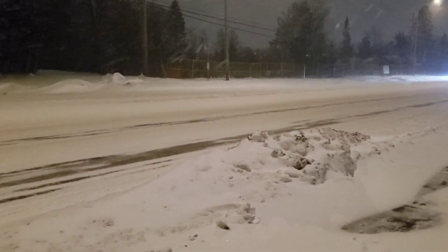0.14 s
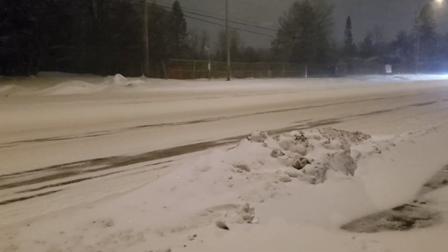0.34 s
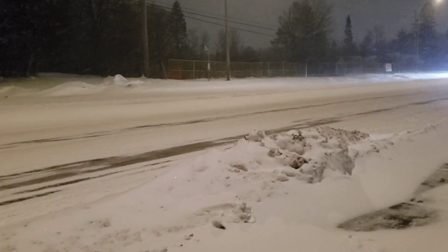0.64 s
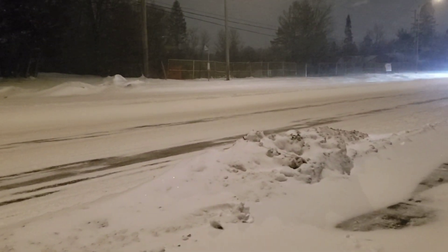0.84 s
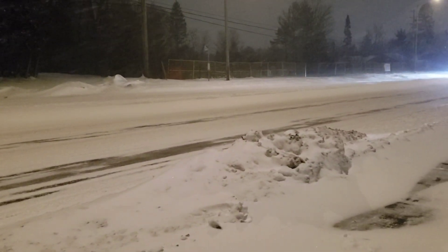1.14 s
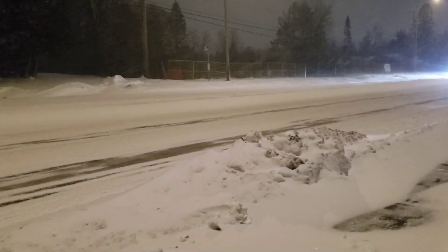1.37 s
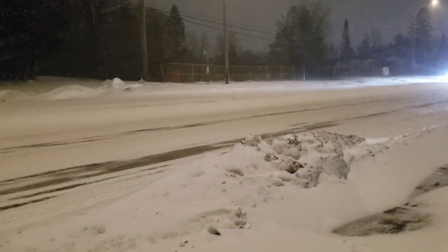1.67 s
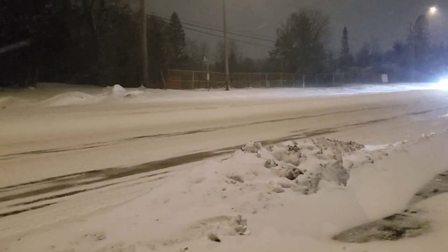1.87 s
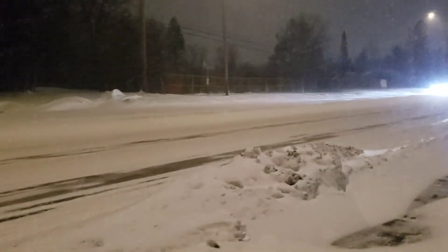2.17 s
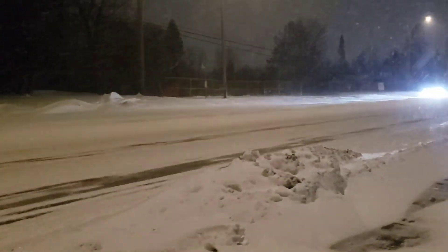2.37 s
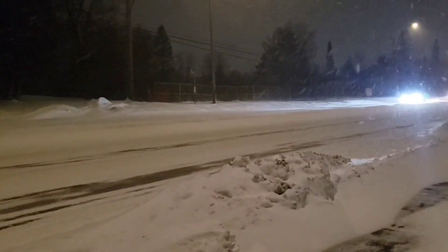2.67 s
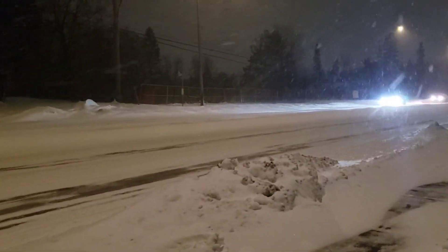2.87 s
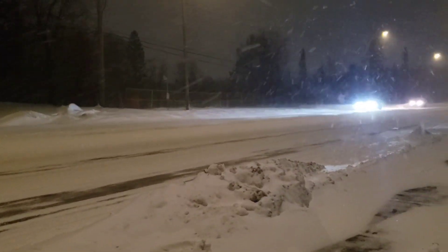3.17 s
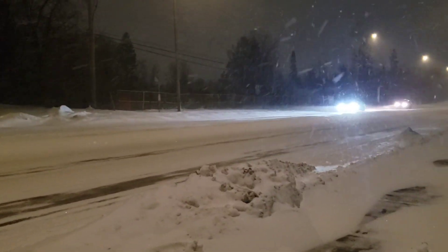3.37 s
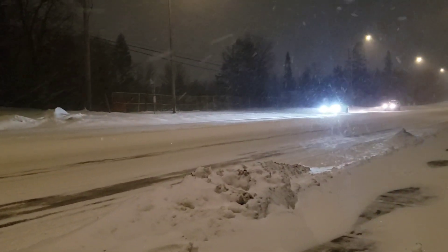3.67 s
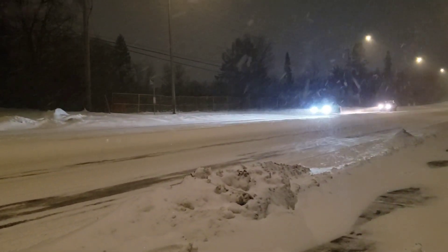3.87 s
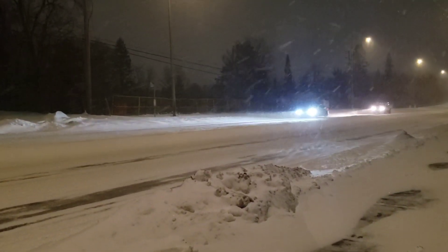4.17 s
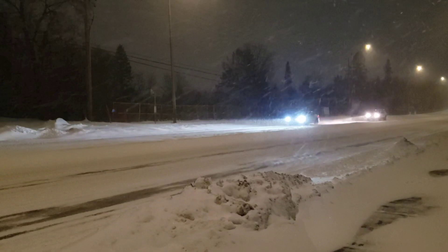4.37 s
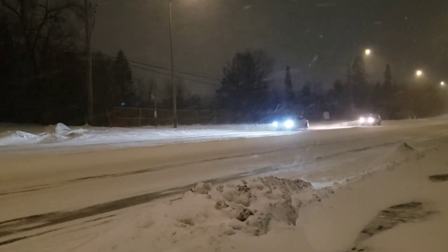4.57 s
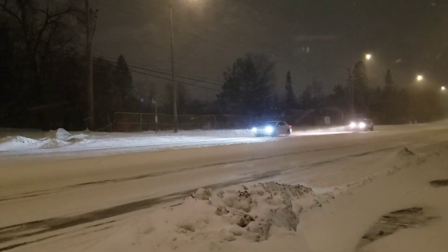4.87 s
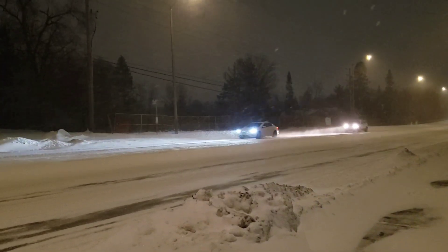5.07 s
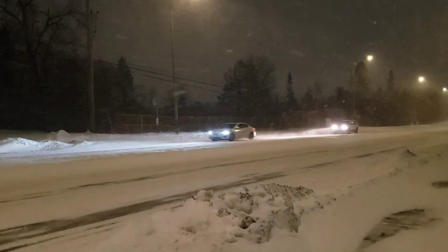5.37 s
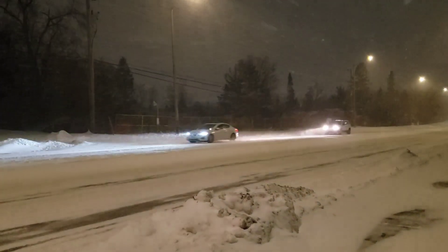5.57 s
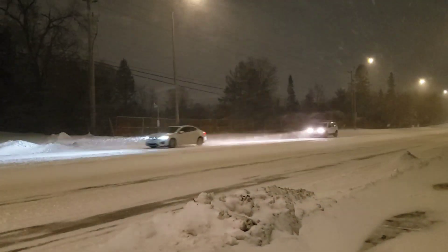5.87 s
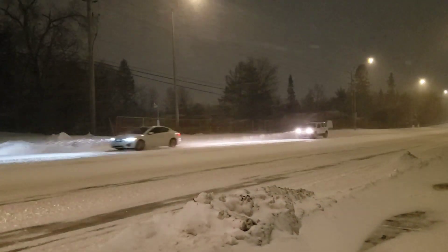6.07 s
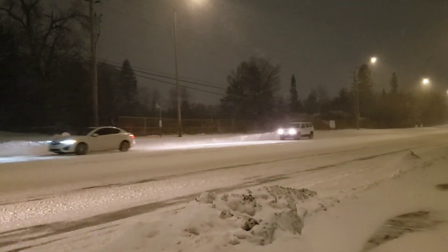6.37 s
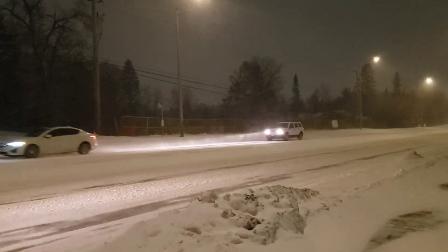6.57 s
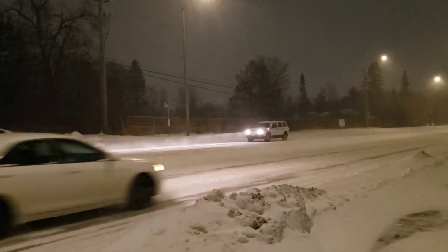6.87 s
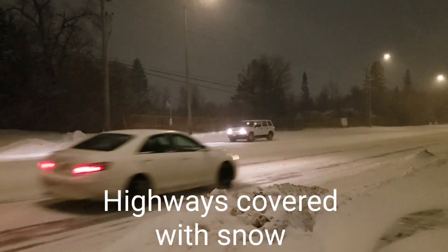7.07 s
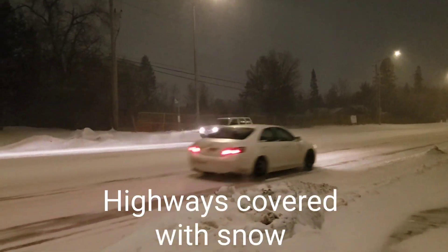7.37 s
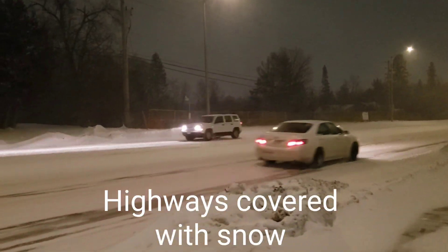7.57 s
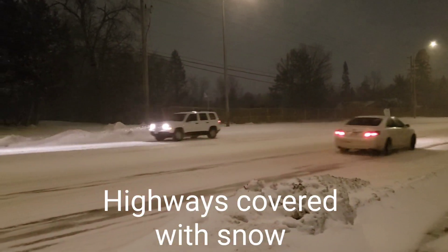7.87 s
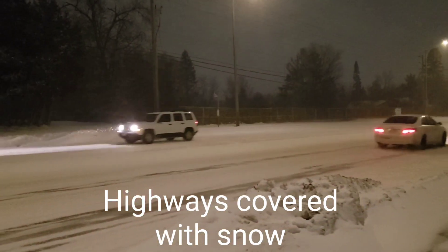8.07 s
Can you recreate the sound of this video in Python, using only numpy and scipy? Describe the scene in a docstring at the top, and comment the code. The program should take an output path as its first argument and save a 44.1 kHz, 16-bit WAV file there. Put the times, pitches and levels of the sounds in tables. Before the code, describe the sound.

Close, bassy wind buffeting shifts irregularly between the two channels of a phone microphone. Short gusts with fine icy patter give way to a lull of distant wind, traffic murmur and thin hiss. Halfway, fluttering resumes and builds to a hard burst of hollow knocks, deep thumps and torn hiss. Cars rolling over snow are only a soft wash behind it, and the wind finally subsides.

```python
"""Gusts of a snowstorm buffet the two ports of a phone microphone beside a road, with lulls between.
Noise bands flutter and rumble apart in each port; hard gusts tear into hiss, and direct hits knock and thump.
Short bursts of high noise are snow grains on the case: a fine patter in flurries, and single larger ticks.
Behind lie quieter coloured noises: wavering far wind and traffic, sifting snow, microphone hiss, and tyres
that swell and fade. One faint, thin swish crosses the long lull."""
import sys
import numpy as np
from scipy import signal
from scipy.fft import rfft, irfft, next_fast_len
from scipy.io import wavfile
from scipy.ndimage import uniform_filter1d

SR = 44100
rng = np.random.default_rng(int(sys.argv[2]) if len(sys.argv) > 2 else 0)


def to_wav(sig):
    """Store sig (one row per channel, or 1-D mono) as 16-bit WAV at the path in sys.argv[1].

    Samples outside -1..1 are clipped; the rate is SR.
    """
    pcm = np.clip(np.atleast_2d(sig), -1, 1) * 32767
    pcm = np.round(pcm).astype(np.int16)
    wavfile.write(sys.argv[1], SR, pcm.T)  # frames by channels


N = 362943
T = np.arange(N) / SR


def from_db(db):
    """Decibels to gain."""
    return np.exp(np.asarray(db) * np.log(10) / 20)


def to_db(gain):
    """Gain to decibels."""
    return 20 * np.log10(gain + 1e-6)


def rms_one(x):
    """Scale each channel to rms 1."""
    return x / np.sqrt(np.mean(x ** 2, axis=-1, keepdims=True) + 1e-20)


def level_over_time(rows):
    """Join (time, level) rows by straight lines."""
    s, db = np.transpose(rows)
    return np.interp(T, s, db)


def at_hz(spectrum, hz):
    """Read a spectrum on a log-frequency axis."""
    points_hz, points_db = np.transpose(spectrum)
    return np.interp(np.log(hz), np.log(points_hz), points_db)


def panned(balance_db):
    """Left and right gains of constant total power; positive leans left."""
    gains = from_db(np.array([[.5], [-.5]]) * balance_db)
    return gains / np.sqrt(np.mean(gains ** 2, axis=0))


def drift(corner_hz):
    """Smooth chance with spread 1, unrelated at the two ports: noise through two equal low-pass stages."""
    step, settling = 40, 2000   # drawn at every 40th sample; the filter's start is dropped
    r = np.exp(-2 * np.pi * corner_hz * step / SR)
    chance = rng.standard_normal((2, N // step + 2 + settling))
    slow = rms_one(signal.lfilter([1], [1, -2 * r, r * r], chance)[:, settling:])
    return np.array([np.interp(np.arange(N) / step, np.arange(len(c)), c) for c in slow])


def coloured(x, spectrum):
    """Give a signal a smooth spectrum that falls away towards and beyond its ends; rms 1."""
    size = next_fast_len(N)
    hz = np.maximum(np.arange(size // 2 + 1) * SR / size, 1)
    low_end = 1 / (1 + (spectrum[0][0] / hz) ** 4)
    high_end = 1 / (1 + (hz / (2 * spectrum[-1][0])) ** 6)
    gain = from_db(at_hz(spectrum, hz)) * low_end * high_end
    return rms_one(irfft(rfft(x, size) * gain, size)[:, :N])


def noise(spectrum):
    """Coloured noise, unrelated in the two channels."""
    return coloured(rng.standard_normal((2, N)), spectrum)


def evened(x, size):
    """Take the slow swings out of a noise by dividing by its running rms over size samples."""
    return x / np.sqrt(np.maximum(uniform_filter1d(x ** 2, size, axis=-1), 1e-12))


def band_passed(x, order, low_hz, high_hz):
    """Keep one band of a signal."""
    return signal.sosfilt(signal.butter(order, [low_hz, high_hz], "band", fs=SR, output="sos"), x)


def gust_shape(start, hold, force_db, swell_db):
    """A gust announces itself, rises, swells or sags, and drops into its wake; hard ones are cut cleaner."""
    attack_s, release_s = .018, 0.032   # the release is shorter in hard gusts
    lead_db, lead_s = -8.5, .02   # the first eddies run ahead of a gust
    wake_db, wake_s = -11, 0.11   # a weaker trail of eddies follows it
    # lead and wake lose 0.22 dB for each dB by which the gust exceeds -45 dB
    clean_db = 0.22 * max(force_db + 45, 0)
    age, after = np.maximum(T - start, 0), np.maximum(T - start - hold, 0)
    lead = from_db(lead_db - clean_db) * np.exp(np.minimum(T - start, 0) / lead_s)
    attack = np.maximum(1 - np.exp(-(age / attack_s) ** 2), lead)
    drop = np.exp(-after / (release_s * from_db(-clean_db)))
    wake = from_db(wake_db - clean_db) * np.exp(-after / wake_s)
    grown_db = swell_db * (np.minimum(age / hold, 1) - .5)
    return attack * np.maximum(drop, wake) * from_db(grown_db) + 1e-9, grown_db


def flow():
    """Gust powers add over a faint breeze: force, treble edge, eddy pitch, share of each port and slow push."""
    # gusts at the ports, levels before trims and drifts: (start [s], hold [s], force [dB],
    # swell over the hold [dB], edge: 900-2500 Hz against force, before swell [dB], eddy pitch [Hz],
    # left-right balance [dB], rumble [dB], rumble left-right balance [dB])
    gusts = [(-0.005, 0.27, -47, -6.5, -14, 344, -3.5, -49.5, -8),
             (0.352, 0.055, -49, -17.5, -23, 370, 0, -53, -9),
             (0.527, 0.03, -64, -4, -44, 380, 5, -58, -28), (0.635, 0.03, -52.5, 5, -35, 385, 2, -54, -13),
             (0.71, 0.13, -62, -11, -35, 368, 5, -55.5, -28),
             (1.048, 0.058, -52.5, 10.5, -38, 390, 10, -60.5, -24),
             (1.546, 0.046, -66.5, 1, -33, 320, 0, -71, -16), (3.257, 0.1, -51.5, -2, -15, 384, -1, -47, 1),
             (3.377, 0.12, -57.5, -5, -23, 300, -1, -52, -10),
             (3.554, .21, -52.5, -6, -17, 524, -2.5, -55, 7),
             (3.813, 0.18, -50, -9, -17.5, 413, -0.5, -49.5, -3),
             (4.023, 0.15, -52, -5, -27, 387, -2.5, -56.5, -15),
             (4.22, 0.19, -59.5, 3, -40, 330, -1, -55, -12),
             (4.372, 0.2, -53, 6.5, -19.5, 462, 0, -59.5, 4.5),
             (4.59, 0.14, -48.5, -1, -12.5, 613, 0, -53.5, 2),
             (4.767, .055, -60.5, -11, -16, 400, 13, -57, -6),
             (5.272, 0.23, -42.5, 10, -9.5, 425, -1.5, -44.5, 1.5),
             (5.578, 0.31, -41, 4, -8.5, 456, -3, -45.5, 6.5),
             (5.942, 0.057, -38.5, 4.5, -10, 415, 2, -43, 2), (6.054, 0.23, -33, 6.5, -10, 370, -2, -40, 2),
             (6.369, 0.057, -25.5, 3.5, -12, 378, -5, -31.5, -1),
             (6.465, 0.44, -31.5, -5, -11.5, 363, -4, -37.5, 2.5),
             (6.944, 0.2, -30, 0, -14, 364, -1, -35, -12.5),
             (7.213, 0.057, -43.5, -19.5, -11, 380, 3, -42, -20),
             (7.441, 0.051, -40, 2.5, -21, 440, 1.5, -51.5, -2),
             (7.548, .16, -54.5, 0.5, -23.5, 373, 2, -57.5, -22),
             (7.849, 0.16, -50.5, -3.5, -21, 350, -0.5, -54, -22),
             (8.11, 0.095, -50.5, -8, -25.5, 325, -1, -52.5, -15)]
    edge_per_swell = 0.083   # dB of edge gained for each dB by which a gust swells
    rumble_follows = 0.87   # share of the gust's swing in dB that the rumble follows
    # between gusts a breeze remains, with an edge of -23 dB and an eddy pitch of 400 Hz
    breeze_db, breeze_rumble_db, breeze_rumble_balance_db = -81, -84, -21
    breeze = from_db(breeze_db) ** 2
    power, edge, pitch = breeze, breeze * -23, breeze * 400
    push = (from_db(breeze_rumble_db) * panned(breeze_rumble_balance_db)) ** 2
    for start, hold, force_db, swell_db, edge_db, hz, balance_db, rumble_db, rumble_balance_db in gusts:
        shape, grown_db = gust_shape(start, hold, force_db, swell_db)
        gust = (shape * from_db(force_db)) ** 2
        power = power + gust * panned(balance_db) ** 2
        edge = edge + gust * (edge_db + edge_per_swell * grown_db)
        pitch = pitch + gust * hz
        full_push = from_db(rumble_db) * panned(rumble_balance_db)
        push = push + shape ** (2 * rumble_follows) * full_push ** 2
    total = power.mean(axis=0)
    return to_db(np.sqrt(total)), edge / total, pitch / total, np.sqrt(power / total), np.sqrt(push)


def surges(per_s=90, fade_s=0.015):
    """Small eddies strike at random, each rising in about 2 ms and fading slowly, around a running mean."""
    strikes = (rng.random((2, N)) < per_s / SR) * rng.uniform(0.43, 1, (2, N))
    push = signal.lfilter([1], [1, -np.exp(-1 / (fade_s * SR))], strikes + 1e-18)
    push = uniform_filter1d(push, size=90, axis=-1)
    swings = push - uniform_filter1d(push, size=2200, axis=-1)
    return np.clip(rms_one(swings), -2.5, 1.4)


def flutter(force_db, edge_db, pitch_hz):
    """Eddies of all sizes, strongest near one pitch; a higher edge means smaller ones and tilts the treble up."""
    # colour of wind in the ports: (frequency [Hz], level [dB per Hz])
    port = [(140, 3.5), (200, 4), (280, 2), (390, 1.5), (550, -2.5), (780, -4.5), (1100, -10.5),
            (1550, -16.5), (2200, -25.5), (3100, -38), (4400, -41), (6200, -97)]
    knee_hz, usual_edge_db, tilt = 520, -13, 1.0   # tilt: dB per octave for each dB of edge
    hump_db, hump_octaves, patchy_db = 5, 0.68, 2.5
    full_db, thinning = -33, 0.77   # below this force the bass thins out
    white = rng.standard_normal((2, 2, N))   # neighbouring bands take different noises
    edges = 120 * 2 ** np.arange(0, 6.6, .5)   # half-octave bands
    slope_db = tilt * (np.clip(edge_db, -32, -6) - usual_edge_db)   # per octave
    # in light wind the phone thins the bass, most on the left
    thin_db = thinning * np.minimum(force_db - full_db, 0) * [[2], [.5]]
    out, body_power = 0, 0
    for k, (low, high) in enumerate(zip(edges, edges[1:])):
        hz = np.sqrt(low * high)
        band = evened(band_passed(white[k % 2], 3, low, high), size=2600)
        hump = np.exp(-(np.log2(hz / pitch_hz) / hump_octaves) ** 2)
        tilt_db = slope_db * np.clip(np.log2(hz / knee_hz), 0, 2.2)
        gain = from_db(at_hz(port, hz) + hump_db * hump + tilt_db) * np.sqrt(high - low)
        shade_db = thin_db if hz < 240 else 0
        out = out + gain * band * from_db(shade_db + patchy_db * drift(70))
        if 180 < hz < 850:   # the force is the level of this body
            body_power = body_power + gain ** 2
    return from_db(force_db) * out / np.sqrt(body_power)


def rumble(push, churn, trim_db=2.5, churn_db=4.5, lumpy_db=3.0, lag_s=0.011):
    """Large eddies push on each port as slow lumps of pressure that trail the gust."""
    # colour of the pressure lumps: (frequency [Hz], level [dB per Hz])
    spectrum = [(16, -30), (40, -6), (65, 4.5), (100, -1.5), (150, -8), (210, -10.5), (300, -37)]
    keep = np.exp(-1 / (lag_s * SR))
    trailing = signal.lfilter([1 - keep], [1, -keep], push)
    lumps = from_db(trim_db + lumpy_db * drift(21) + churn_db * churn)
    return trailing * lumps * evened(noise(spectrum), size=3000)


def far_murmur(side_db=8, waver_db=2.0):
    """Far wind and traffic blur into a wavering noise, stronger on the left."""
    # the distance: (time [s], level before waver [dB])
    levels = [(0, -62.5), (1.3, -73), (1.7, -69.5), (2.3, -69), (2.7, -72.5), (3.2, -70), (5, -66),
              (8.23, -70)]
    # its colour: (frequency [Hz], level [dB per Hz])
    spectrum = [(25, -18), (65, -10), (130, -12), (200, -18), (300, -6), (420, 0), (550, 0), (780, -11),
                (1400, -15), (2300, -20.5), (4000, -24), (8000, -34)]
    level_db = level_over_time(levels) + waver_db * drift(29)
    return from_db(level_db) * panned(side_db) * noise(spectrum)


def sifting_snow(trim_db=-10.0, side_db=22):
    """Snow sifting over the ground makes a bright noise of changing level, nearly all on the left."""
    # the sifting: (time [s], level before trim [dB])
    levels = [(0, -59), (.55, -55.5), (.8, -64.5), (2.9, -66), (3.4, -56.5), (5.2, -56), (8.23, -58.5)]
    # its colour: (frequency [Hz], level [dB per Hz])
    spectrum = [(2400, -20), (3400, -10), (4800, -3), (6800, 0), (8500, -2), (11000, -8), (16000, -13)]
    return from_db(level_over_time(levels) + trim_db) * panned(side_db) * noise(spectrum)


def microphone_hiss(trim_db=-3.0, side_db=14):
    """The microphone's own high noise, stronger on the left."""
    # the hiss: (time [s], level before trim [dB])
    levels = [(0, -59), (3, -59.5), (6.7, -60.5), (7.1, -62.5), (8.23, -65.5)]
    # its colour: (frequency [Hz], level [dB per Hz])
    spectrum = [(1700, -20), (2300, -15), (3000, -8), (4200, -9), (5500, -13), (8400, -11), (9800, -1),
                (12000, 0), (16000, -.5)]
    return from_db(level_over_time(levels) + trim_db) * panned(side_db) * noise(spectrum)


def ticks(trim_db=-1, low_hz=7500, fade_s=.0011):
    """A larger grain shatters on the case: high-passed noise that fades in a millisecond or two."""
    # larger grains: (time [s], peak before trim and high-pass [dB])
    grains = [(0.03, -40), (0.233, -37.5), (0.2838, -49), (0.2904, -46), (0.5564, -43), (1.1764, -56),
              (3.105, -48), (3.369, -40.5), (3.8807, -43), (5.4126, -42), (5.4244, -49), (5.444, -43),
              (5.655, -46), (5.672, -38), (6.2517, -52), (6.4892, -38), (6.556, -51), (6.711, -41)]
    crush, age = np.zeros((2, N)), T[:SR // 100]
    for (s, peak_db), side_db in zip(grains, rng.normal(0, 4.4, len(grains))):
        at = int(s * SR)
        crush[:, at:at + len(age)] += from_db(peak_db + trim_db) * panned(side_db) * np.exp(-age / fade_s)
    high_pass = signal.butter(2, low_hz, "high", fs=SR, output="sos")
    return signal.sosfilt(high_pass, crush * rng.standard_normal((2, N)) + 1e-18)


def flurries():
    """Level of the driven snow in dB: each flurry thickens to a peak and thins out again."""
    # snow driven against the case: (peak time [s], fade to either side [s], level before trim [dB])
    rows = [(0.03, 0.064, -48), (0.285, 0.034, -51), (3.7, 0.78, -65.5), (5.665, 0.056, -57),
            (5.869, 0.13, -59), (6.225, 0.084, -52), (6.427, 0.019, -45), (6.559, 0.083, -50.5),
            (6.77, 0.063, -50.5), (6.89, 0.01, -50.5)]
    power = sum((from_db(db) * np.exp(-np.abs(T - s) / fade_s)) ** 2 for s, fade_s, db in rows)
    return to_db(np.sqrt(power))


def snow_grains(spray_db, trim_db=-2, grains_per_s=1100):
    """Fine ice grains patter on the case in clumps: random impulses of many sizes, coloured bright."""
    # colour of a grain on the case: (frequency [Hz], level [dB per Hz])
    spectrum = [(3000, 0), (6000, -13), (8300, -18), (9800, -2.5), (12500, 1.5), (16000, -4)]
    sizes = from_db(4.5 * np.minimum(rng.exponential(1, (2, N)), 3.5)) * rng.choice([-1, 1], (2, N))
    born = rng.random((2, N)) < grains_per_s / SR
    clumps = from_db(4 * drift(90))
    return from_db(spray_db + trim_db) * coloured(sizes * born * clumps, spectrum)


def buffets(knock_trim_db=-4.5, thump_trim_db=-1):
    """A direct hit swells in milliseconds: a hollow knock in the port over one deep swing of pressure."""
    # eddies that hit a port squarely, levels before trims:
    # (time [s], knock [dB], left-right balance [dB], pitch [Hz], thump [dB])
    hits = [(0.039, -35, -7, 412, -37), (0.09, -30.5, -13, 425, -33), (0.138, -30, 16, 284, -29),
            (0.627, -37.5, -11, 397, -48), (0.657, -29, 2, 358, -49), (0.738, -38.5, 16, 355, -61),
            (1.098, -31, 15, 378, -65), (1.265, -57.5, 3, 336, -73), (3.059, -53, 20, 425, -80),
            (3.283, -35.5, 1, 375, -42), (3.44, -40, 4, 280, -39), (3.596, -37, -19, 650, -42),
            (3.815, -37, -5, 300, -48), (3.847, -35, -8, 317, -50), (4.159, -32.5, 2, 317, -56),
            (4.405, -38, -8, 446, -58), (4.617, -34.5, -6, 646, -59), (4.895, -41.5, 29, 338, -75),
            (5.272, -35, 2, 590, -49), (5.312, -28.5, -10, 580, -53), (5.448, -25, -4, 380, -42),
            (5.496, -23, -1, 320, -29), (5.604, -25, -8, 397, -47), (5.995, -31, -15, 397, -31),
            (6.075, -23.5, -2, 242, -30), (6.326, -20, 7, 393, -44), (6.383, -21, -2, 456, -32),
            (6.486, -34, 10, 352, -36), (6.526, -17, -8, 347, -32), (6.552, -11.5, -2.5, 400, -27),
            (6.715, -24, 0, 337, -34), (6.779, -14, 3, 272, -18), (6.901, -16.5, 21, 427, -22),
            (6.965, -19.5, 0, 345, -38), (7.002, -40, -4, 334, -15), (7.035, -26, -6, 328, -14),
            (7.104, -14, -6, 490, -30), (7.182, -29, 15, 477, -50), (7.224, -23, -10, 378, -38),
            (7.292, -33, 31, 450, -58), (7.410, -33.5, 35, 620, -58), (7.468, -26, 15, 410, -52),
            (7.675, -47, 2, 470, -60), (7.814, -36.5, 23, 436, -59), (7.852, -30.5, 38, 413, -54),
            (7.938, -32, 1, 286, -32)]
    sharpness, reach = 6.0, 1.95   # Q of the hollow; band edges as a ratio to its pitch
    middle_thump_hz, fade_s = 70, 0.014
    # a knock of -20.5 dB has this rise; one 28 dB weaker takes twice as long
    hard_db, hard_rise_s, rise_doubles_db = -20.5, 0.0026, 28
    out, age = np.zeros((2, N)), T[:SR // 5]
    for s, peak_db, balance_db, hz, deep_db in hits:
        white = rng.standard_normal((2, len(age)))
        hollow = signal.lfilter(*signal.iirpeak(hz, sharpness, fs=SR), white)
        hollow = evened(band_passed(hollow, 3, hz / reach, hz * reach), size=500)
        knock = from_db(peak_db + knock_trim_db) * panned(balance_db) * hollow
        thump_hz = middle_thump_hz * rng.uniform(.6, 1.4, (2, 1))
        swing = np.sin(2 * np.pi * thump_hz * age) * rng.choice([-1, 1], (2, 1))
        thump = from_db(deep_db + thump_trim_db) * swing
        rise_s = hard_rise_s * 2 ** ((hard_db - peak_db) / rise_doubles_db)
        swell = (1 - np.exp(-(age / rise_s) ** 2)) * np.exp(-age / fade_s)
        at = int(s * SR)
        out[:, at:at + len(age)] += (swell * (knock + thump))[:, :N - at]
    return out


def thin_swish(at_s=2.02, length_s=0.082, level_db=-74, low_hz=4050, high_hz=4600):
    """A faint, thin swish in the long lull: a narrow band of noise that swells and fades."""
    band = rms_one(band_passed(rng.standard_normal((2, N)), 2, low_hz, high_hz))
    return from_db(level_db) * np.exp(-((T - at_s) / length_s) ** 2) * band


def tyres_on_snow(side_db=10, waver_db=2.0):
    """Cars roll past over packed snow: tyre noise grows as they near and fades as they leave."""
    # colour of the tread: (frequency [Hz], level [dB per Hz])
    spectrum = [(240, -20), (330, 6), (480, 1), (700, -3.5), (950, -6.5), (1250, -5), (1650, -5),
                (2100, -19), (3500, -60)]
    nearest_s, nearest_db = 6.04, -52.5   # level before waver
    passing_s, fade_db_per_s = 0.87, 23.5   # time to pass; rate of fading far off
    beyond_s = np.hypot(T - nearest_s, passing_s) - passing_s
    level_db = nearest_db - fade_db_per_s * beyond_s
    return from_db(level_db + waver_db * drift(13)) * panned(side_db) * noise(spectrum)


def tearing(force_db, churn, spray_db, onset_db=-35, growth=1.9):
    """Hard flow tears into a ragged hiss at the rim of the port; below the onset it falls off steeply."""
    # colour of torn air: (frequency [Hz], level [dB per Hz])
    spectrum = [(1200, -20), (2200, -6), (3200, -4), (4500, -8), (6000, -11.5), (8200, -19.5), (10000, -11),
                (15000, -40)]
    shortfall_db = np.minimum(uniform_filter1d(force_db, size=3500) - onset_db, 0)
    ragged_db = 2.2 * churn + 3.2 * drift(500)
    return from_db(spray_db + growth * shortfall_db + ragged_db) * noise(spectrum)


def scene(wind_db=0.55, churn_db=3.0, waver_db=0.8):
    """One flow drives flutter, rumble and tearing; each port feels its own eddies."""
    force_db, edge_db, pitch_hz, share, push = flow()
    force_db = force_db + waver_db * drift(13.6)[0]
    spray_db, churn = flurries(), surges()
    wind = share * flutter(force_db + wind_db + churn_db * churn, edge_db, pitch_hz)
    wind = wind + rumble(push, churn) + buffets() + tearing(force_db, churn, spray_db)
    snow = snow_grains(spray_db) + ticks()
    background = far_murmur() + sifting_snow() + microphone_hiss() + tyres_on_snow()
    return wind + snow + background + thin_swish()


def record(dry, ceiling=1.0, cutoff_hz=15600):
    """The hardest blows are rounded off and the top is cut steeply."""
    rounded = ceiling * np.tanh(dry / ceiling)
    return signal.sosfilt(signal.ellip(12, .1, 80, cutoff_hz, fs=SR, output="sos"), rounded)


dry = scene()
out = record(dry)
to_wav(out)
```